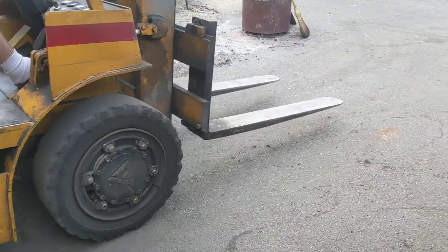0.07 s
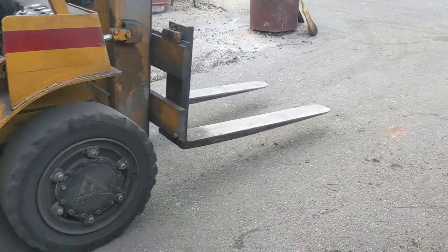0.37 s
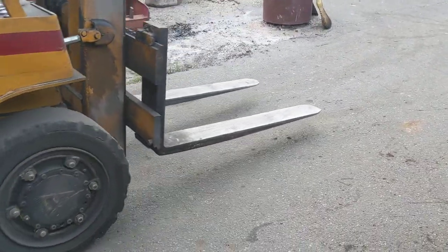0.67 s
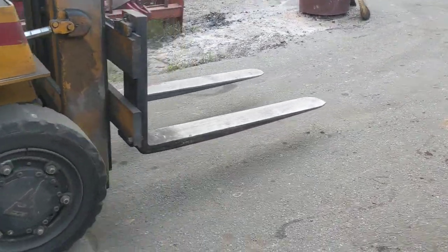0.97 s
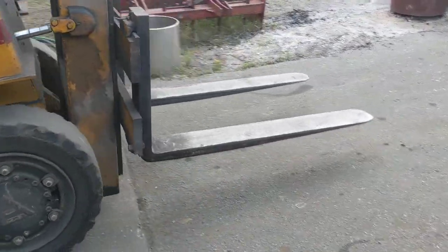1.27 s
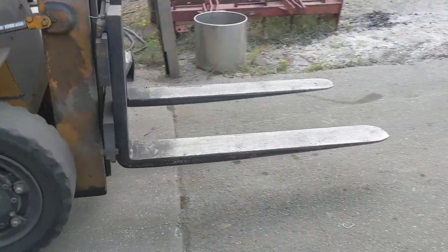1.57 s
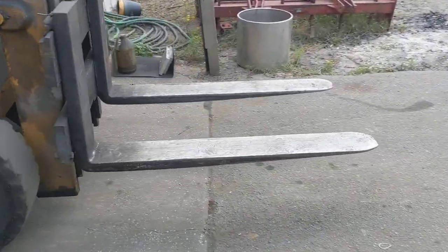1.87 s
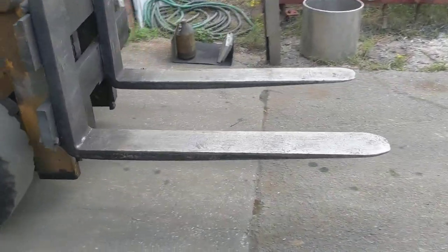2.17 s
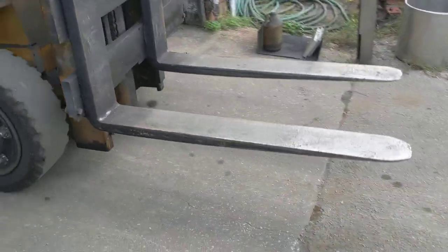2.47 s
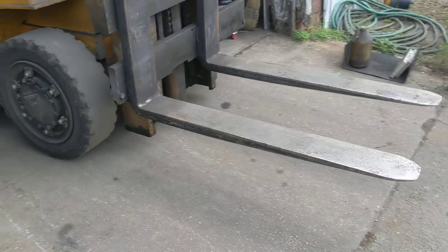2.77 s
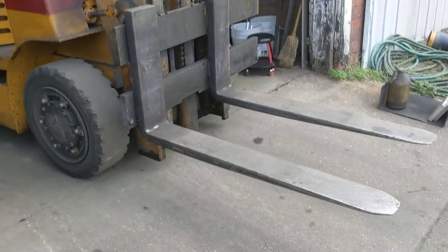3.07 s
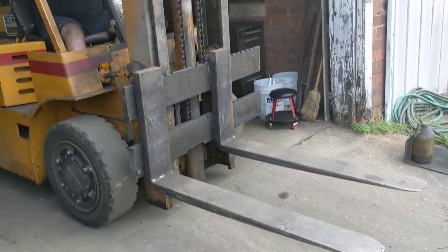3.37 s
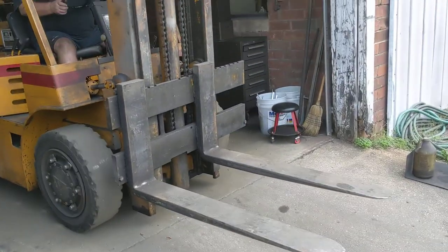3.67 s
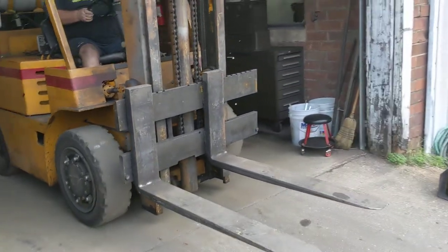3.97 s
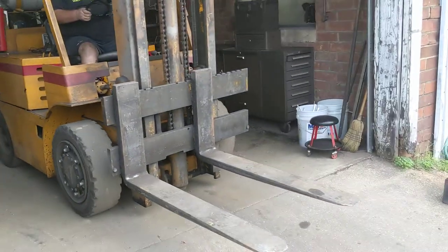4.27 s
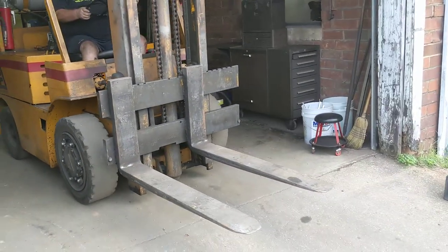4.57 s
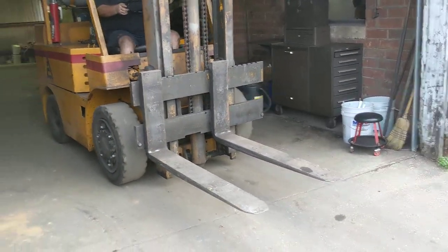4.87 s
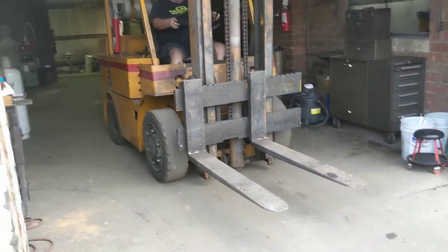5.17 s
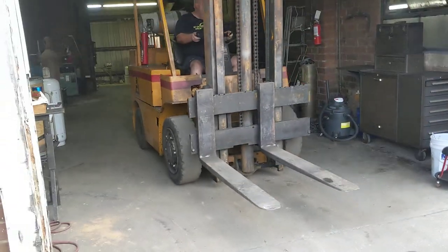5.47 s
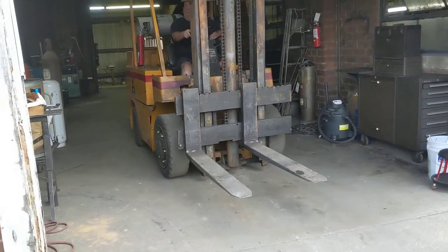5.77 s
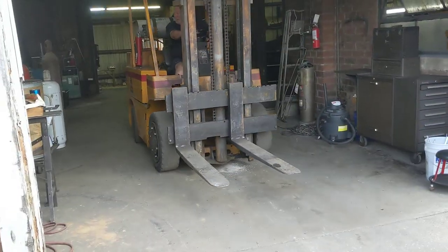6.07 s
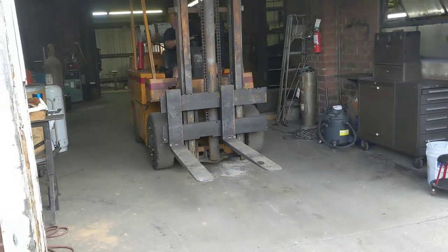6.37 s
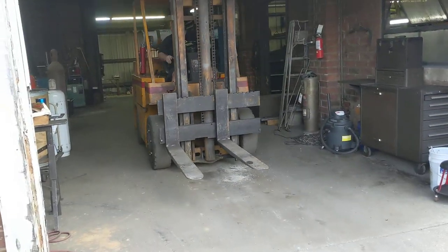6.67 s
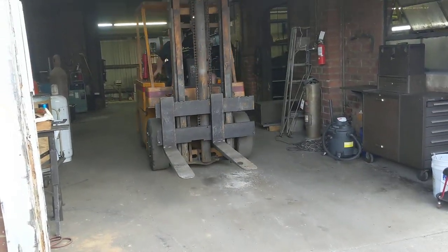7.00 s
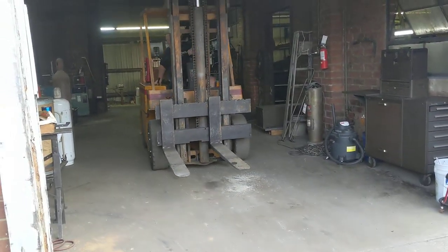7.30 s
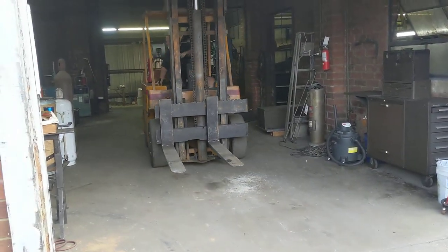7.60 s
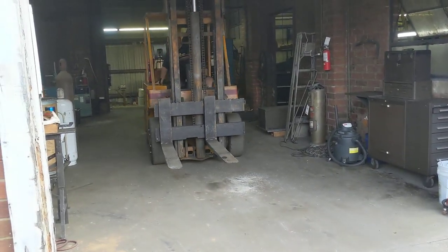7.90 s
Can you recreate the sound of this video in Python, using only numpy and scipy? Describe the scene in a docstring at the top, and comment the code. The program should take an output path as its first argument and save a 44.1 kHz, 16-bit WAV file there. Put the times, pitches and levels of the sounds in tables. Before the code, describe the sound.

A forklift engine runs loudly close by from the start, with a deep throbbing exhaust, valve clatter, fan hiss and a low axle growl. Between about 0.7 and 1.3 seconds its steel mast and forks clank in a quick cluster over the paving. Around 1.5 to 2 seconds the engine winds down to a loping idle, with a few lighter clanks until 3 seconds, small cracks of grit under the tyres and a very faint gear whine. At about 4.2 seconds it revs up with soft low thuds and holds a booming note while backing into a workshop, where the clatter gains a slight echo. From 5.8 seconds the revs fall again, and a tyre briefly scrubs grit near 6 seconds. The engine idles more quietly and further away until the end at 8 seconds. The brighter sounds sit to the right.

```python
"""Forklift reversing into a workshop

A six-cylinder forklift backs past across a paved yard, drops to idle, revs through a doorway and
idles indoors. Each firing sends a pulse and a puff of gas down the exhaust, which throbs and booms
under valve clatter, fan hiss and a faint gear whine. Mast and forks clank over joints in the
paving, the tyres crack and scrub grit, and the workshop reverberates."""
import sys
import numpy as np
from scipy import signal
from scipy.fft import rfft, irfft, next_fast_len
from scipy.io import wavfile
from scipy.ndimage import uniform_filter1d

SR = 44100
rng = np.random.default_rng(int(sys.argv[2]) if len(sys.argv) > 2 else 0)


def log_audio(samples):
    """Write samples as a 16-bit WAV file to the path given in sys.argv[1]."""
    # one column per channel
    frames = np.atleast_2d(samples).T
    # limit to full scale, then quantise
    limited = np.clip(frames, -1, 1)
    pcm = np.round(limited * 32767).astype(np.int16)
    wavfile.write(sys.argv[1], SR, pcm)


N = 354563
TIME = np.arange(N) / SR

# Engine speed: time_s, firing_hz
ENGINE_SPEED = [(0, 46.4), (0.6, 47.1), (0.96, 47.05), (1.25, 47.5), (1.5, 44.2), (1.62, 42.5),
                (1.77, 37.5), (1.9, 31.2), (2.08, 25.4), (2.4, 24.5), (2.85, 25.05), (3.65, 24.7),
                (4.14, 24.8), (4.28, 35), (4.5, 41), (4.68, 42), (5.73, 42.3), (6.02, 30), (6.3, 26.9),
                (6.9, 25.3), (8.04, 24.7)]
def firing_hz():
    """Firing rate of the engine."""
    return curves(ENGINE_SPEED)[0]


# Exhaust harmonics, one table a stage: firing_multiple, relative_db
CLOSE_HARMONICS = [(1, 7.5), (2, 5.5), (3, -10.5), (4, -7.5), (5, -7), (6, -7), (7, -24), (8, -27),
                   (9, -13), (10, -9.5), (11, -15), (12, -42.5)]
COAST_HARMONICS = [(1, -18), (2, 5.5), (3, -8.5), (4, -12.5), (5, -5), (6, 2.5), (7, -2), (8, -26.5),
                   (10, -9), (12, -22.5)]
DOOR_HARMONICS = [(1, 1), (2, 3.5), (3, 3), (4, 11), (5, -17), (6, -1.5), (7, -12), (8, -24.5), (12, -19.5)]
INDOOR_HARMONICS = [(1, -10), (2, 18), (3, 7), (4, -2), (5, -1.5), (6, 8), (7, -12), (8, -13), (9, 2),
                    (10, -7), (12, -33)]
def exhaust_pulses(phase):
    """One pressure pulse a firing, its shape crossfaded between the stages of the drive."""
    shapes = (pulse(CLOSE_HARMONICS, smear=0.096), pulse(COAST_HARMONICS, smear=0.12),
              pulse(DOOR_HARMONICS, smear=0), pulse(INDOOR_HARMONICS, smear=0.12))
    return sum(share * np.interp(phase, np.arange(len(shape)) / len(shape), shape, period=1)
               for share, shape in zip(stage_shares(), shapes))


def pulse(harmonics, smear):
    """A sharp front, then the pipe rings; smear delays the higher harmonics."""
    orders, db = np.transpose(harmonics)
    multiple = np.fft.fftfreq(2048, 1 / 512)
    log_gain = np.log(amp(np.interp(abs(multiple), [0, *orders, 24], [-12, *db, -70])))
    log_minimum_phase = np.conj(signal.hilbert(log_gain))
    spectrum = np.exp(log_minimum_phase - 1j * smear * multiple * abs(multiple))
    shape = np.fft.ifft(spectrum[::4]).real  # whole multiples only
    return unit_rms(shape - shape.mean())


# Level laws: idle_db, speed_db_per_doubling, throttle_db, effort_db, distance_db_per_doubling,
# flank_db, indoor_db
THROB_LAW = (-30.5, 1, 13.5, -3, -2.5, 0.5, -6)
BOOM_LAW = (-36, 8.5, 3, 2, 1, -3.5, -0.56)
def exhaust(firings, split_hz=115, lope_db=1.8, sag_db_per_hz_s=0.12):
    """Low throb and upper boom: even under load, loping at idle, ragged while the speed swings."""
    idle = np.clip(1 - 2 * throttle(), 0, 1)
    run_down = overrun()
    lope = wander(0.3 * firings)
    swing_hz_s = lag(abs(pick_up_hz_s()), lag_s=0.11) * (1 - throttle())
    stumble = (0.0035 + 0.0009 * swing_hz_s) * wander(firings)
    pressure = exhaust_pulses(firings + 0.02 * idle * lope + stumble)
    pressure *= amp(-0.35 * wander(firings + 0.5))
    low = signal.sosfiltfilt(signal.butter(5, split_hz, fs=SR, output="sos"), pressure)
    throb = even_level(low * cylinder_gain(firings, THROB))
    throb_db = level_db(THROB_LAW) + lope_db * idle * lope - sag_db_per_hz_s * swing_hz_s
    chug = cylinder_gain(firings, CHUG) ** idle
    tone = even_level((pressure - low) * cylinder_gain(firings, GAS) * chug)
    ragged = np.clip(0.16 + 0.22 * (idle + run_down) + 0.025 * swing_hz_s, 0, 1)
    boom = np.sqrt(1 - ragged) * tone + np.sqrt(ragged) * silencer(firings, chug, idle, run_down)
    return -amp(throb_db) * throb - amp(level_db(BOOM_LAW)) * boom


# Silencer box resonances: freq_hz, relative_db
BOX_PULLING = [(102, -12), (135, -8), (150, -1), (162, 5.5), (178, 9), (192, 8), (206, -18), (222, -9),
               (250, -3), (288, -1), (335, -11)]
BOX_OVERRUN = [(105, -17), (128, 0.5), (144, 7), (160, -4.5), (180, 11), (200, 3), (222, -12), (252, -2),
               (288, -6.5), (335, -25.5)]
BOX_IDLING = [(98, -15), (112, -12), (125, -1.5), (137, -3.5), (153, 11), (166, -4.5), (186, -1.5),
              (205, -0.5), (228, -2.5), (255, -10.5), (290, -11), (335, -17)]
def silencer(firings, chug, idle, run_down, decay_firings=0.97):
    """Gusts of gas set the box booming, higher under load and on the run-down than at idle."""
    gusts = turbulence(firings) * np.exp(-(firings % 1) / decay_firings) * chug
    pulling = (1 - idle) * (1 - run_down) * colour(gusts, BOX_PULLING)
    slowing = run_down * colour(gusts, BOX_OVERRUN)
    idling = idle * (1 - run_down) * colour(gusts, BOX_IDLING)
    return even_level(pulling + slowing + idling)


# Tailpipe gas spectra: freq_hz, relative_db
NEAR_GAS = [(25, -17), (70, 18.5), (120, 10.5), (200, 1), (285, 8), (320, 3), (365, 8), (415, 3), (445, 5),
            (475, 8), (520, 6), (600, -27)]
FAR_GAS = [(25, -18), (55, 4.5), (105, 3.5), (180, 1.5), (280, 0), (340, 0), (440, -8.5), (600, -24.5)]
# Level law: columns as THROB_LAW
PUFF_LAW = (-45.5, 13, -3, 1, -1.5, -2, -1)
def tailpipe_puffs(firings, close, near_db=7.5, far_db=6.5):
    """Turbulent gas leaves the pipe with each firing; from afar only its low roar carries."""
    puff = np.exp(-(firings % 1)) * cylinder_gain(firings, GAS)
    gas = turbulence(firings)
    near = amp(near_db) * colour((0.52 + puff) * gas, NEAR_GAS)
    far = amp(far_db) * colour((1 + puff) * gas, FAR_GAS)
    return amp(level_db(PUFF_LAW)) * (close * near + (1 - close) * far)


def turbulence(firings, repeat_idling=0.35, repeat_pulling=0.82):
    """Gas noise tied to crank angle: each cylinder repeats its own puff, with fresh eddies on top."""
    cylinders = len(CYLINDER_TRIMS)
    size = cylinders * 128
    bins = np.arange(size // 2 + 1)
    spectrum = np.exp(2j * np.pi * rng.random((2, len(bins))))
    spectrum *= bins % cylinders > 0  # no firing harmonics
    angle = firings / cylinders * size
    steps = np.arange(int(angle[-1]) + 2)
    cycle = unit_rms(irfft(spectrum, size))[:, steps % size]
    repeated = np.array([np.interp(angle, steps, side) for side in cycle])
    eddies = np.array([np.interp(angle, steps, side) for side in noise(len(steps))])
    repeat = repeat_idling + (repeat_pulling - repeat_idling) * throttle() / throttle().max()
    gas = np.sqrt(repeat) * repeated + np.sqrt(1 - repeat) * eddies
    return unit_rms(gas * np.sqrt(firing_hz()))


THROB, GAS, KNOCK, CHUG = range(4)
# Cylinders in firing order: throb_db, gas_db, knock_db, chug_db
CYLINDER_TRIMS = [(-1.5, 1, -1, 1.3), (-2.3, -.7, -1, -1.4), (-1.4, .8, -1.5, 1), (-2.1, -.3, .5, -1.8),
                  (-1.7, .5, -1.5, .9), (-2.3, -.5, 0, -1.3)]
def cylinder_gain(firings, column):
    """Gain of the cylinder that is firing."""
    trims_db = np.transpose(CYLINDER_TRIMS)[column]
    return amp(np.interp(firings - 1 / 4, np.arange(len(trims_db)), trims_db, period=len(trims_db)))


def knocks(firings, depth, decay_slots, scatter_db):
    """Two slots a firing, one knock in each, weighted by cylinder, over a steady rush."""
    slot = (2 * firings).astype(int)
    delay = rng.random(1024) / 2
    strength = np.clip(rng.standard_normal(1024), -2, 2)
    age = (2 * firings) % 1 - delay[slot]
    trim_db = np.transpose(CYLINDER_TRIMS)[KNOCK][slot // 2 % len(CYLINDER_TRIMS)]
    peak = depth * amp(trim_db + scatter_db * strength[slot])
    envelope = peak * (age > 0) * np.exp(-abs(age) / decay_slots)
    return noise() * np.sqrt(1 + envelope ** 2)


# Engine block spectra: freq_hz, relative_db
BLOCK_CLOSE = [(350, 2.5), (600, 0.5), (662, 2), (841, 0), (1020, -1.5), (1220, -8.5), (1610, -1.5),
               (1920, -5), (2270, 0), (2780, -6), (3210, -6), (3930, -5.5), (5000, -19.5), (6500, -53),
               (11000, -120)]
BLOCK_DOOR = [(350, -7), (600, -0.5), (673, -3.5), (797, -1.5), (910, -2.5), (1080, -5), (1190, -10),
              (1660, -5), (1970, -9), (2150, -6), (2830, -8.5), (3350, -9.5), (4040, -10), (4780, -18),
              (5000, -23), (6500, -36), (11000, -120)]
BLOCK_IDLING = [(330, -16), (480, -0.5), (570, 1), (660, -0.5), (780, 0), (930, 0), (1100, -3.5),
                (1300, -6), (1560, -4), (2050, -7.5), (2700, -6), (3200, -10.5), (3900, -13.5),
                (5000, -19.5), (6500, -23)]
def valve_clatter(firings):
    """Valve gear rattles the block; the colour follows the stage of the drive."""
    close, coast, door, indoor = stage_shares()
    rattle = knocks(firings, depth=0.42, decay_slots=0.099, scatter_db=3)
    return (close * amp(-1.04) * colour(rattle, BLOCK_CLOSE, ripple_db=1.5)
            + door * amp(-0.94) * colour(rattle, BLOCK_DOOR, ripple_db=2.5)
            + (coast + indoor) * amp(-1.5) * colour(rattle, BLOCK_IDLING, ripple_db=1.5))


# Loose cover spectrum: freq_hz, relative_db
COVER_SPECTRUM = [(2000, -54), (2350, -3), (2600, -2.5), (2850, -3.5), (3200, -8.5), (3700, -19)]
def cover_chatter(firings, trim_db=-9, fits_db=5):
    """A loose cover chatters in fits."""
    fits = amp(fits_db * np.clip(wander(firings), -2, 1))
    chatter = fits * knocks(firings, depth=1.8, decay_slots=0.22, scatter_db=1.5)
    return amp(trim_db) * colour(chatter, COVER_SPECTRUM, ripple_db=2)


# Hiss of fan and grit: freq_hz, relative_db
HISS_SPECTRUM = [(4150, -2.5), (4720, -9), (5160, 0), (5760, 5.5), (6520, 1), (7480, 5.5), (8420, -0.5),
                 (9480, 1.5), (10620, -8.5), (11680, -3.5), (12580, -10.5), (14150, -10), (15350, -27)]
def fan_hiss(firings):
    """The fan's rush of air, flickering in time with the engine."""
    air = knocks(firings, depth=0.7, decay_slots=0.13, scatter_db=5.5)
    return colour(air, HISS_SPECTRUM, ripple_db=1.3, mode_gap_hz=90)


# Level laws: columns as THROB_LAW
CLATTER_LAW = (-45.5, 6, 2, 0.5, -2, 5.5, 0.75)
FAN_LAW = (-57.5, 10, -0.96, 2.5, -3.5, 2.5, 3)
def engine_bay(firings, flutter_db=0.96):
    """Valves, cover and fan flutter in level together from firing to firing."""
    clatter = amp(level_db(CLATTER_LAW)) * (valve_clatter(firings) + cover_chatter(firings))
    hiss = amp(level_db(FAN_LAW)) * fan_hiss(firings)
    return (clatter + hiss) * amp(flutter_db * wander(firings))


# Combustion rasp spectrum: freq_hz, relative_db
RASP_SPECTRUM = [(2300, -5), (2750, 9.5), (3300, -11), (3950, 2.5), (4400, -9)]
def combustion_rasp(firings, full_effort_db=-45.5):
    """Hard, even combustion knocks while the engine picks up speed."""
    knocking = knocks(firings, depth=0.91, decay_slots=0.2, scatter_db=0)
    return amp(full_effort_db) * effort() * colour(knocking, RASP_SPECTRUM)


# Throttle pulls: start_s, end_s, opening_fraction
THROTTLE_PULLS = [(0, 1.283, 0.72), (1.308, 1.67, 0.5), (4.168, 5.76, 0.94)]
def throttle(open_s=0.11, shut_s=0.094):
    """Throttle opening, 0-1: each pull rises, holds and releases."""
    t = TIME[::64]
    opening = np.zeros(len(t))
    for start_s, end_s, fraction in THROTTLE_PULLS:
        attack = 1 - (start_s > 0) * np.exp(-np.maximum(t - start_s, 0) / open_s)
        release = np.exp(-np.maximum(t - end_s, 0) / shut_s)
        opening += fraction * attack * release
    return np.interp(TIME, t, opening)


# Run-downs with the throttle shut: start_s, end_s
RUN_DOWNS = [(1.68, 2.15), (5.78, 6.7)]
def overrun():
    """1 while the engine runs down to idle, else 0, with soft edges."""
    gate = sum(1. * ((TIME > start_s) & (TIME < end_s)) for start_s, end_s in RUN_DOWNS)
    return uniform_filter1d(gate, SR // 10)


def pick_up_hz_s():
    """Firing rate gained per second; negative while slowing."""
    return np.gradient(firing_hz()) * SR


def effort(full_hz_s=25):
    """Strain of picking up speed, about 0-1."""
    return lag(np.maximum(pick_up_hz_s(), 0), lag_s=0.3) / full_hz_s


# Pulling close by, coasting, pulling in the doorway, idling indoors: start_s, end_s
DRIVE_STAGES = [(0, 1.29), (2.1, 3.77), (4.45, 5.47), (6.3, 8.5)]
def stage_shares():
    """Crossfade weights of the stages; they sum to 1."""
    return [np.interp(TIME, np.ravel(DRIVE_STAGES), np.repeat(row, 2))
            for row in np.eye(len(DRIVE_STAGES))]


# Path of the truck: time_s, distance_m
TRUCK_PATH = [(0, 1.06), (1.1, 1.21), (1.45, 2.5), (2.0, 2.7), (2.7, 2.9), (3.25, 2.8), (3.75, 3.1),
              (4.6, 3.9), (5.6, 4.4), (6.5, 8.2), (8.04, 11.2)]
def level_db(law, reference_m=2.51, turn_s=(1.34, 1.87), entry_s=(3.3, 3.36)):
    """An engine part's level follows speed, load and the position of the truck."""
    idle_db, speed_db, throttle_db, effort_db, distance_db, flank_db, indoor_db = law
    speed_doublings = np.log2(firing_hz() / firing_hz().min())
    distance_doublings = np.log2(curves(TRUCK_PATH)[0] / reference_m)
    flank = np.interp(TIME, turn_s, [1, 0])  # the bay's open side turns away
    inside = np.interp(TIME, entry_s, [0, 1])  # the tailpipe passes the door
    engine_db = idle_db + speed_db * speed_doublings + throttle_db * throttle() + effort_db * effort()
    return engine_db + distance_db * distance_doublings + flank_db * flank + indoor_db * inside


# Resonances of mast and forks: freq_hz, relative_db
STEEL_SPECTRUM = [(250, 19.5), (390, 15.5), (455, 5), (525, 14), (600, 7.5), (690, 1), (1100, -6.5),
                  (1520, 6.5), (1900, -4), (2600, -5), (3200, 0), (3600, -1), (4100, -4.5), (9000, -16)]
# Ringing bands of the steel clanks: start_s, level_db, centre_hz, spread_octaves, t60_s
CLANK_BANDS = [(.725, -27, 550, 0.59, 0.35), (.765, -22.5, 372, 0.37, 0.23),
               (0.815, -33.5, 4050, 0.06, 0.16), (0.909, -25.5, 3080, 0.77, 0.17),
               (0.918, -19, 1980, 0.65, 0.071), (0.927, -24, 1570, 0.53, 0.049),
               (.93, -21.5, 300, 0.3, 0.32), (1.011, -32, 4340, 1.3, 0.3), (1.076, -23.5, 990, 0.91, 0.25),
               (1.081, -28.5, 326, 0.54, 0.45), (1.09, -28, 746, 0.23, 0.42),
               (1.14, -22.5, 420, 0.59, 0.42), (1.2237, -22, 1530, 0.24, 0.061),
               (1.2249, -24.5, 2960, .7, .03), (1.264, -36, 1550, .14, 0.19),
               (1.812, -31.5, 473, 1.1, 0.39), (2.2545, -33.5, 3320, 0.18, 0.052),
               (2.345, -50, 3670, 0.046, 0.22), (2.384, -36, 527, 0.061, 0.21),
               (2.607, -37, 1090, 1.3, 0.23), (2.624, -30, 423, 0.29, 0.24),
               (2.623, -33.5, 1400, 0.59, 0.091), (2.929, -37, 890, 1.1, 0.17),
               (3.316, -43, 3050, 0.23, 0.16), (3.897, -46.5, 2600, 0.043, 0.31),
               (4.203, -36.5, 2720, 0.088, 0.096)]
def mast_clanks(rise_s=0.0021, skirt_db=-35):
    """Loose steel rings in bands; rows that start almost together sound as one clank."""
    out, t = np.zeros((2, N)), np.arange(16384) / SR
    offsets = np.linspace(-4, 4, 81)
    for start_s, db, centre_hz, spread_octaves, t60_s in CLANK_BANDS:
        hz = centre_hz * 2 ** (offsets * spread_octaves)
        band = np.transpose([hz, read_at(STEEL_SPECTRUM, hz) + skirt_db * (offsets / 3) ** 2])
        ring = colour(noise(len(t)), band, ripple_db=3, mode_gap_hz=25)
        ring /= np.sqrt(uniform_filter1d(abs(signal.hilbert(ring)) ** 2, 256) / 2 + 1e-9)  # flat level
        add(out, start_s, ring * amp(db - 60 * t / t60_s) * (1 - np.exp(-t / rise_s)))
    return out


# Axle note: time_s, pitch_hz, level_db
AXLE_NOTE = [(0, 408, -26), (0.25, 406.4, -41), (0.62, 418, -40), (0.85, 413.5, -41), (1.08, 400, -38),
             (1.32, 375, -36), (1.55, 364, -43), (1.9, 336, -56), (2.2, 312, -85)]
def axle_growl(firings):
    """The axle gears follow the pace of the truck as it rolls close by."""
    hz, db = curves(AXLE_NOTE)
    return amp(db) * trembling_note(firings, hz)


# Panel swells: centre_s, width_s, pitch_hz, level_db
PANEL_SWELLS = [(0.35, 0.66, 510, -51), (0.875, 0.55, 290, -34), (0.967, 0.085, 535, -34),
                (1.3, 0.36, 138, -28.5), (1.856, 0.23, 243, -34.5), (5.62, 0.46, 283, -38)]
def panel_drones(firings):
    """Shaken body panels drone at their own notes."""
    return sum(amp(db) * swell(centre_s, width_s) * trembling_note(firings, hz)
               for centre_s, width_s, hz, db in PANEL_SWELLS)


def trembling_note(firings, hz, depth=0.6, rate=0.6):
    """A narrow note that trembles with the shaking of the engine."""
    tremble = 1 + depth * (wander(rate * firings) + 1j * wander(rate * firings))
    cycles = np.cumsum(hz * np.ones(N)) / SR
    return unit_rms((tremble * np.exp(2j * np.pi * cycles)).real)


# Low thuds: start_s, level_db, pitch_hz
LOW_THUDS = [(4.16, -23.5, 49.4), (4.31, -24, 35.6), (4.425, -19, 38.8), (6.703, -28, 49),
             (6.82, -31, 45.6), (7.52, -38, 48.6), (7.951, -32, 48)]
def low_thuds(rise_s=0.031):
    """Soft low thuds as the engine picks up speed and settles back to idle."""
    out, t = np.zeros((2, N)), np.arange(16384) / SR
    envelope = t / rise_s * np.exp(1 - t / rise_s)
    for start_s, db, hz in LOW_THUDS:
        add(out, start_s, (amp(db) * envelope * np.sin(2 * np.pi * hz * t))[None])
    return out


# Stones under the tyres: start_s, level_db
STONES = [(2.03, -48), (2.254, -52), (2.485, -49), (2.883, -46), (2.96, -48), (2.994, -47), (3.09, -49),
          (3.162, -42), (3.215, -49), (3.41, -54), (3.43, -49), (3.601, -44), (4.148, -41), (4.24, -42),
          (4.375, -40), (4.479, -43), (5.812, -40), (5.85, -48), (6.045, -43), (6.12, -40), (6.19, -50),
          (6.56, -61), (7.19, -57), (7.672, -49)]
def grit_cracks(rise_s=0.004, t60_s=0.1):
    """Single stones give way with a short, bright crunch."""
    out, t = np.zeros((2, N)), np.arange(8192) / SR
    for start_s, db in STONES:
        crunch = colour(noise(len(t)), HISS_SPECTRUM, ripple_db=1.5, mode_gap_hz=200)
        add(out, start_s, crunch * amp(db - 60 * t / t60_s) * (1 - np.exp(-t / rise_s)))
    return out


# Scrub spectrum: freq_hz, relative_db
SCRUB_SPECTRUM = [(2200, -1), (4000, -2), (5000, -6), (7500, 5), (9700, 2), (12000, -4), (15000, -13)]
def tyre_scrub(peak_s=6.11, peak_db=-51, build_s=0.16, fade_s=0.095, grain_db=2):
    """A tyre grinds a stream of fine grains on the smooth floor."""
    grains = amp(grain_db * np.repeat(rng.standard_normal(N // 64 + 1), 64)[:N])
    envelope = np.exp(-((TIME - peak_s) / np.where(TIME < peak_s, build_s, fade_s)) ** 2)
    grinding = colour(noise() * grains, SCRUB_SPECTRUM, ripple_db=1.5, mode_gap_hz=200)
    return amp(peak_db) * envelope * grinding


# Timing gear swells: centre_s, width_s, level_db
GEAR_SWELLS = [(3.1, 1.0, -57), (4.1, .25, -59), (6.42, 0.55, -58.5), (7.365, 0.55, -61.5)]
def gear_whine(firings, teeth_per_firing=37.45, waver_rate=1.6):
    """The timing gears sing faintly at idle, in a thin, wavering line."""
    waver = wander(waver_rate * firings) + 1j * wander(waver_rate * firings)
    envelope = sum(amp(db) * swell(centre_s, width_s) for centre_s, width_s, db in GEAR_SWELLS)
    return envelope * unit_rms((waver * np.exp(2j * np.pi * teeth_per_firing * firings)).real)


# Rumble spectrum: freq_hz, relative_db
RUMBLE_SPECTRUM = [(14, -18), (26, -6), (38, -3), (50, -5), (62, -15), (90, -18)]
def chassis_rumble(db=-46):
    """Steady low rumble of the shaking chassis."""
    return amp(db) * colour(noise(), RUMBLE_SPECTRUM)


# Workshop decay: freq_hz, t60_s
WORKSHOP_DECAY = [(100, 0.41), (500, 1), (3000, 0.13), (12000, 1)]
def workshop_reverb(x):
    """A diffuse tail from brick and sheet metal, each band dying at its own speed."""
    hz, t, bands = signal.stft(noise(SR // 2), SR, nperseg=256)
    decay = amp(-60 * t / read_at(WORKSHOP_DECAY, hz)[:, None])
    tail = signal.istft(bands * decay, SR, nperseg=256)[1]
    return signal.fftconvolve(x, tail / np.linalg.norm(tail[0]), axes=1)[:, :N]


# Left-right likeness: freq_hz, coherence
COHERENCE = [(60, 1), (250, 0.89), (500, 0.46), (1000, 0.35), (2200, 0.28), (5000, 0.028)]
def colour(pair, spectrum, ripple_db=0., mode_gap_hz=45):
    """Filters two unrelated signals, with a ripple of panel modes, into stereo at rms 1."""
    size = next_fast_len(pair.shape[1], True)
    hz = np.fft.rfftfreq(size, 1 / SR)
    right, other = rfft(pair, size)
    coherence = np.clip(read_at(COHERENCE, hz), -0.99, 0.999)
    left = coherence * right + np.sqrt(1 - coherence ** 2) * other
    ripple = np.interp(hz / mode_gap_hz, np.arange(1024), rng.standard_normal(1024))
    skirts = np.minimum(1, np.minimum(hz / spectrum[0][0], spectrum[-1][0] / (hz + 1))) ** 7
    gain = skirts * amp(read_at(spectrum, hz) + ripple_db * ripple)
    return unit_rms(irfft(np.array([left, right]) * gain, size)[:, :pair.shape[1]])


def amp(db):
    """Decibels to gain."""
    return 10 ** (np.asarray(db) / 20)


def unit_rms(x):
    """Scales to rms 1."""
    return x / np.sqrt(np.mean(x ** 2) + 1e-20)


def even_level(x):
    """Evens out the slow level and keeps the beat."""
    return x / np.sqrt(abs(uniform_filter1d(x ** 2, SR // 4)) + 1e-12)


def curves(rows):
    """Each column of a time table, sample by sample."""
    time_s, *columns = np.transpose(rows)
    return [np.interp(TIME, time_s, column) for column in columns]


def read_at(points, hz):
    """Interpolates a table on a log-frequency axis."""
    freq_hz, values = np.transpose(points)
    return np.interp(np.log(hz + 1), np.log(freq_hz + 1), values)


def noise(size=N):
    """Two channels of white noise."""
    return rng.standard_normal((2, size))


def wander(steps):
    """A random value at each whole step, joined by lines."""
    return np.interp(steps, np.arange(512), rng.standard_normal(512))


def swell(centre_s, width_s):
    """Bell-shaped envelope."""
    return np.exp(-2 * ((TIME - centre_s) / width_s) ** 2)


def lag(x, lag_s):
    """One-pole smoothing of a control."""
    pole = np.exp(-1 / (lag_s * SR))
    return signal.lfilter([1 - pole], [1, -pole], x)


def add(mix, start_s, sound):
    """Mixes a sound in at start_s."""
    part = mix[:, round(start_s * SR):][:, :sound.shape[1]]
    part += sound[:, :part.shape[1]]


def scene(room_db=-10):
    """The firing count drives every engine sound; the workshop answers from the doorway on."""
    firings = np.cumsum(firing_hz()) / SR
    close, _, door, indoor = stage_shares()
    low = exhaust(firings) + tailpipe_puffs(firings, close)
    low += panel_drones(firings) + axle_growl(firings) + low_thuds() + chassis_rumble()
    bright = engine_bay(firings) + combustion_rasp(firings) + gear_whine(firings)
    bright += mast_clanks() + tyre_scrub() + grit_cracks()
    return low + bright + amp(room_db) * workshop_reverb(bright * (door + indoor))


# Stereo balance: freq_hz, left_minus_right_db
BALANCE = [(48, 0.3), (112, -2.5), (182, -4), (385, -5), (705, -3), (1300, -5.5), (2420, -11),
           (3920, -15.5), (5120, -12), (6120, -18.8), (7820, -16), (9520, -9.6), (11820, -18.5),
           (14520, -17)]
def record(dry, fade_s=0.003, cutoff_hz=15350):
    """Shades the treble on the left, softens both ends and limits the band."""
    size = next_fast_len(N + 4096, True)
    hz = np.fft.rfftfreq(size, 1 / SR)
    ratio = amp(read_at(BALANCE, hz))
    coherence = np.clip(read_at(COHERENCE, hz), 0, 1)
    right = 2 / np.sqrt(1 + ratio ** 2 + 2 * coherence * ratio)  # keeps the level of the centre
    heard = irfft(rfft(dry, size) * np.array([ratio * right, right]), size)[:, :N]
    heard *= np.minimum(1, np.minimum(TIME, TIME[-1] - TIME) / fade_s)
    lowpass = signal.firwin(511, cutoff_hz, window=("kaiser", 9), fs=SR)
    return signal.oaconvolve(heard, lowpass[None], "same")


dry = scene()
out = record(dry)
log_audio(out)
```